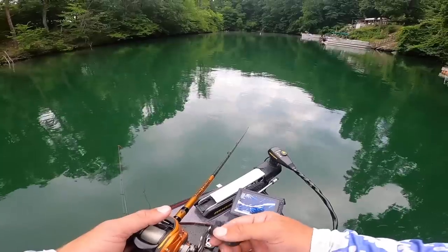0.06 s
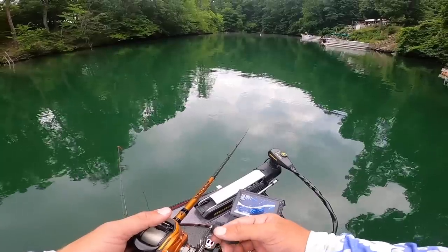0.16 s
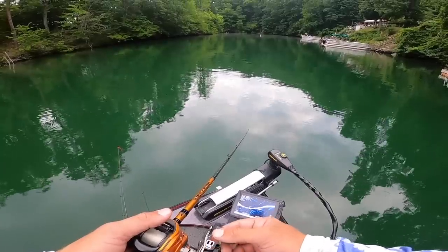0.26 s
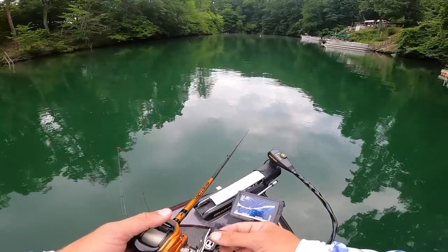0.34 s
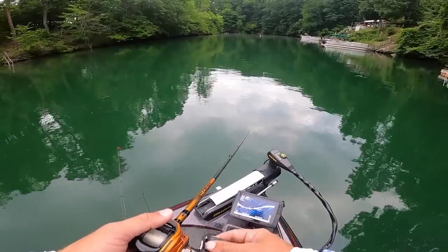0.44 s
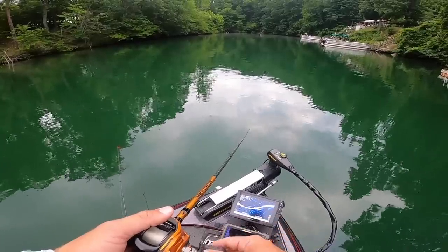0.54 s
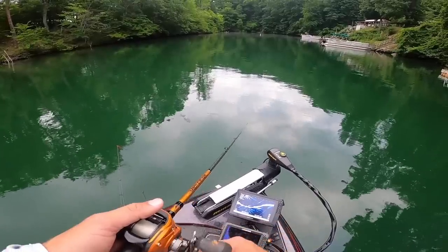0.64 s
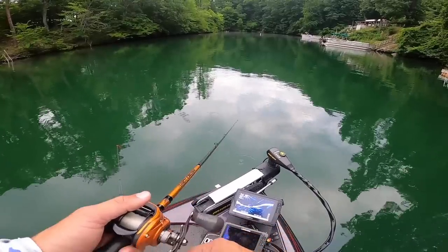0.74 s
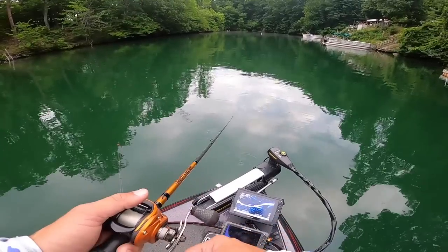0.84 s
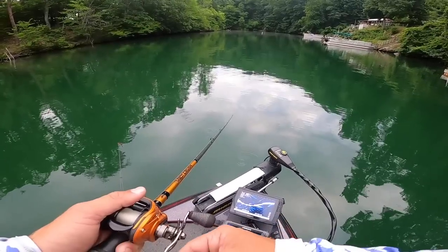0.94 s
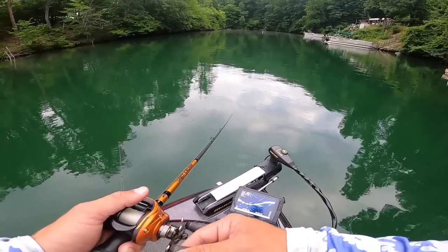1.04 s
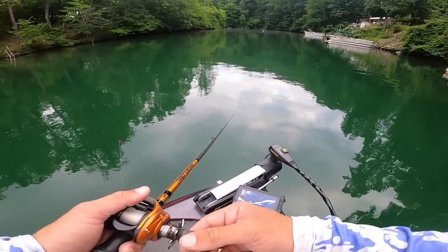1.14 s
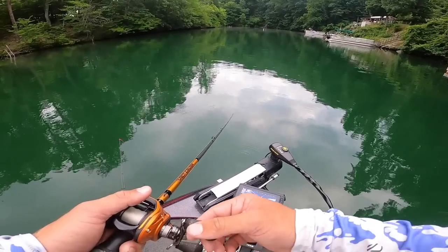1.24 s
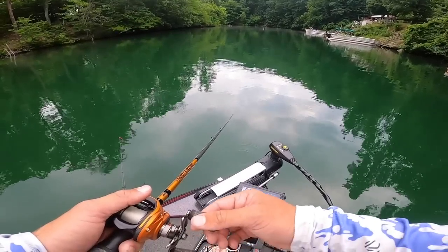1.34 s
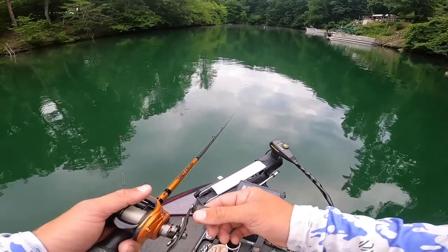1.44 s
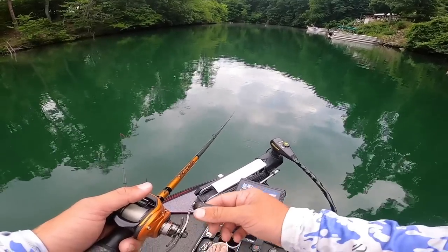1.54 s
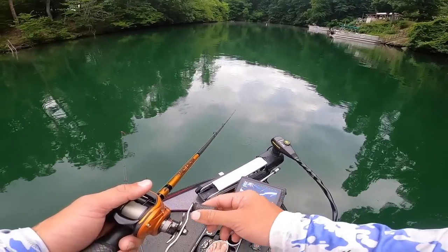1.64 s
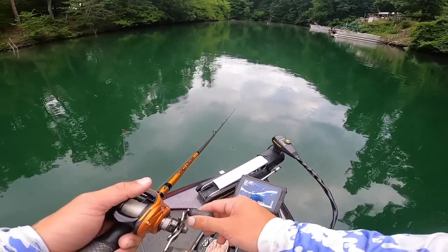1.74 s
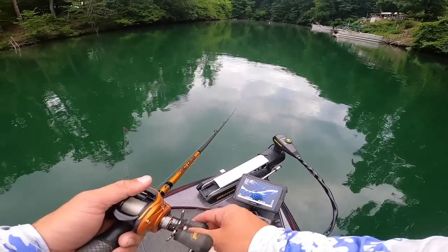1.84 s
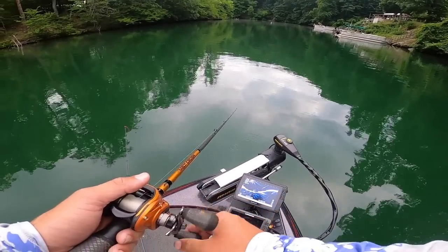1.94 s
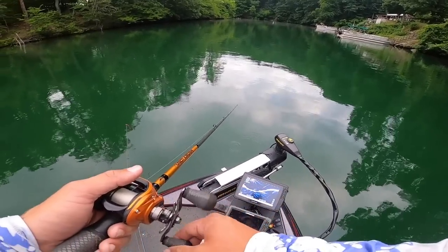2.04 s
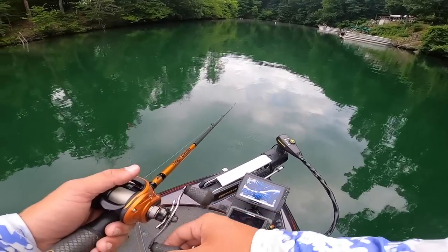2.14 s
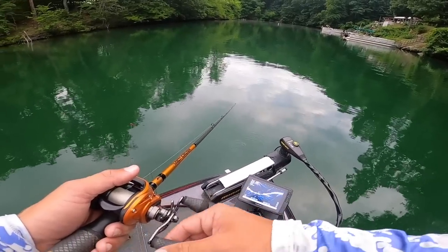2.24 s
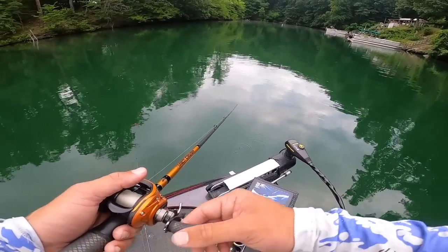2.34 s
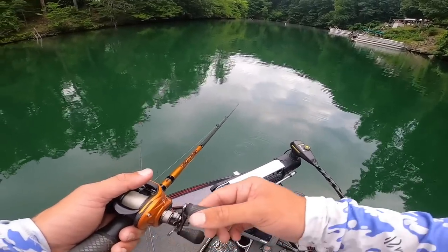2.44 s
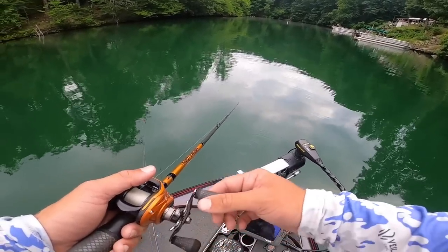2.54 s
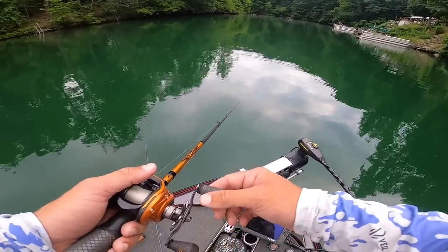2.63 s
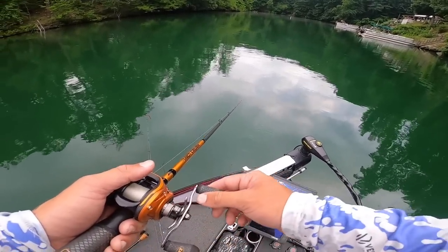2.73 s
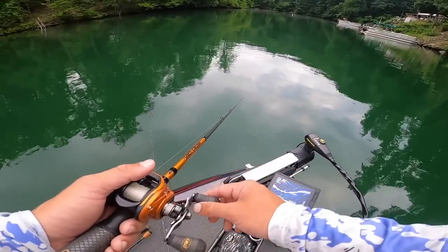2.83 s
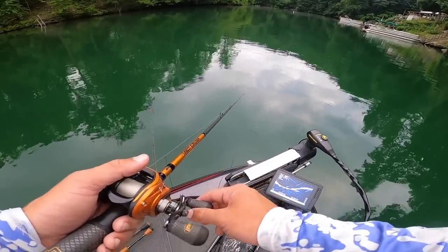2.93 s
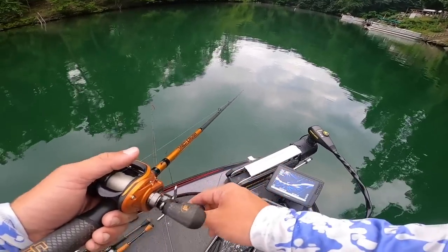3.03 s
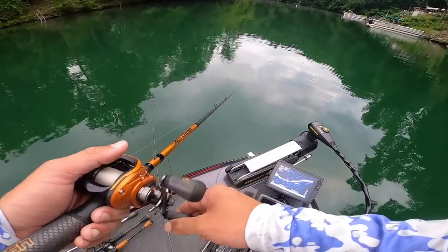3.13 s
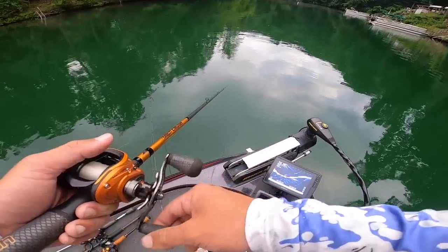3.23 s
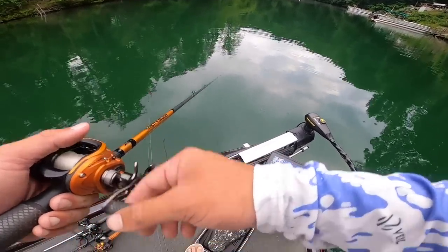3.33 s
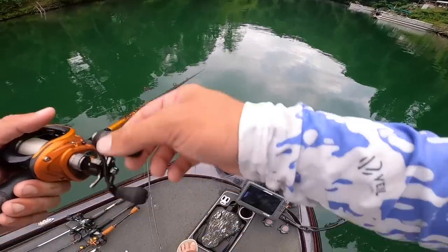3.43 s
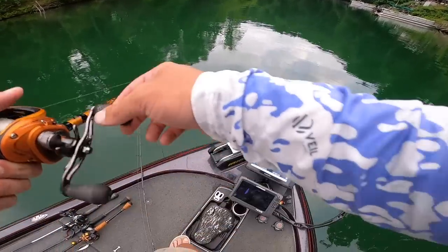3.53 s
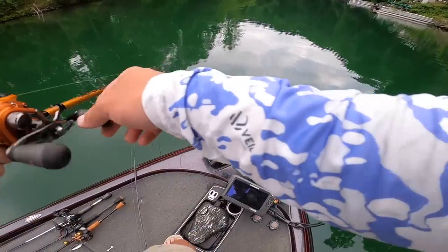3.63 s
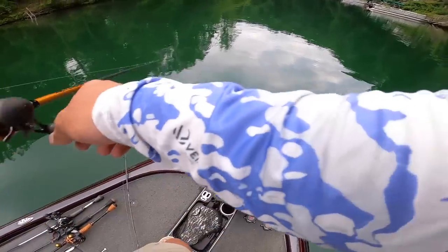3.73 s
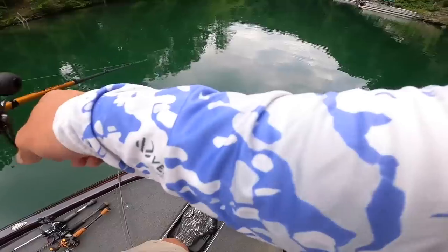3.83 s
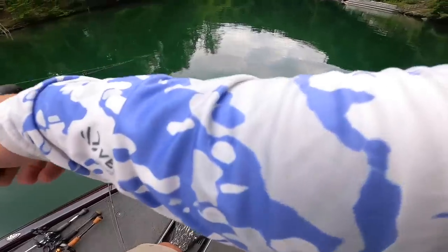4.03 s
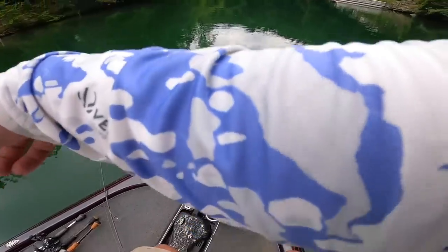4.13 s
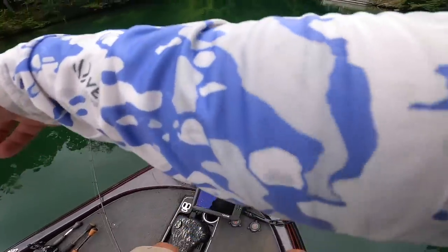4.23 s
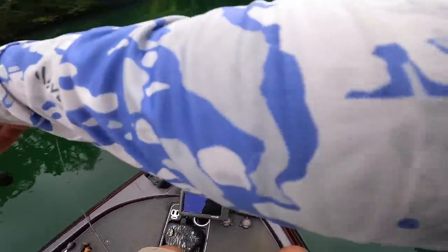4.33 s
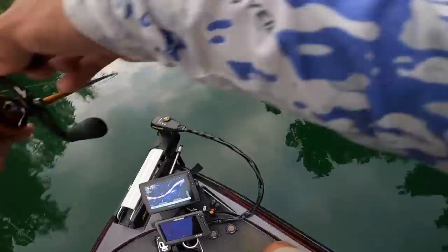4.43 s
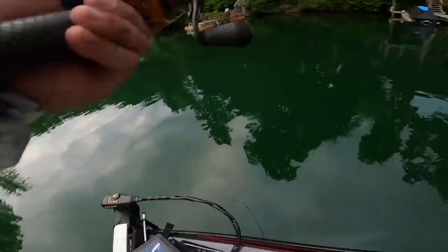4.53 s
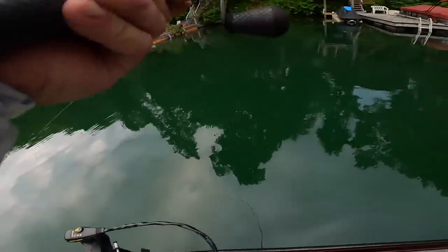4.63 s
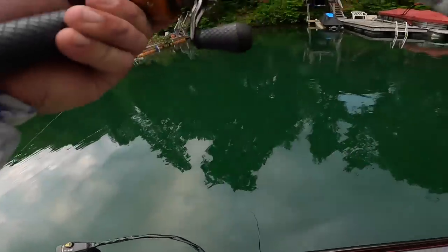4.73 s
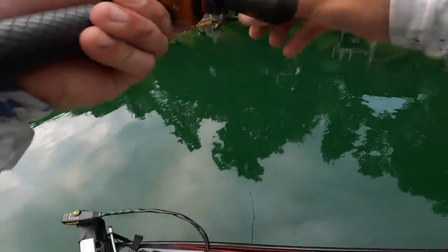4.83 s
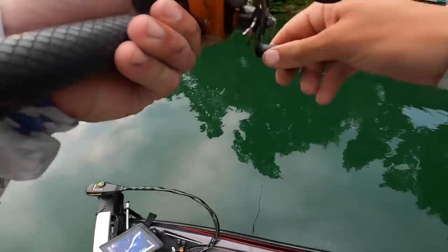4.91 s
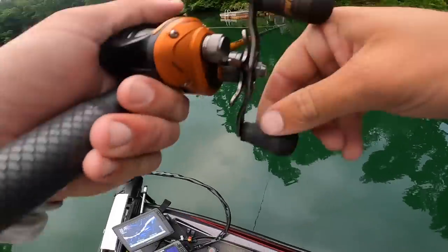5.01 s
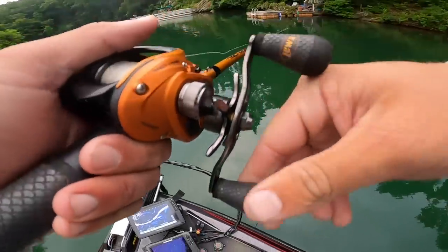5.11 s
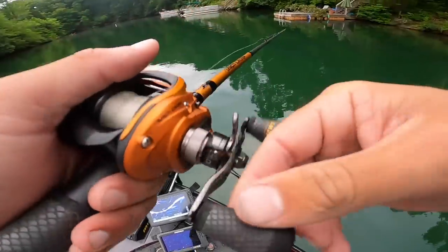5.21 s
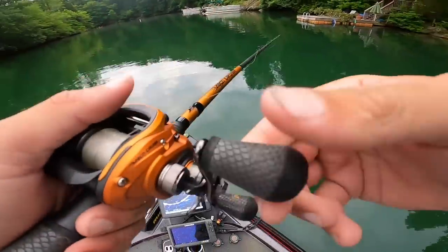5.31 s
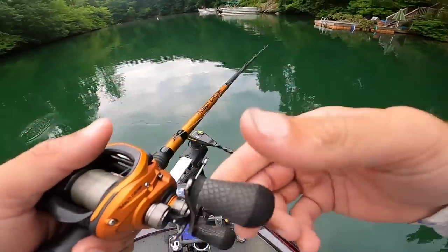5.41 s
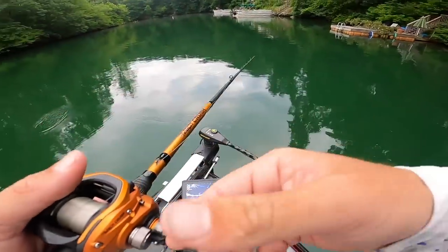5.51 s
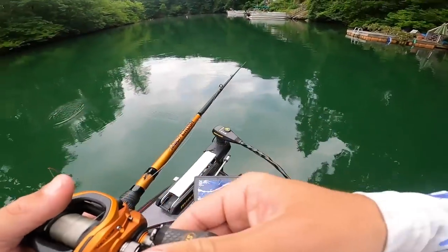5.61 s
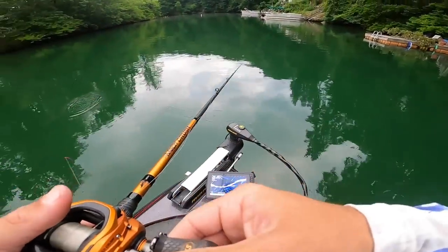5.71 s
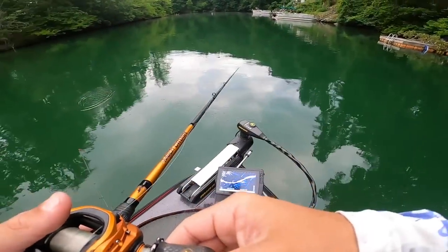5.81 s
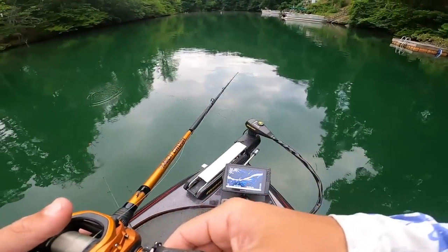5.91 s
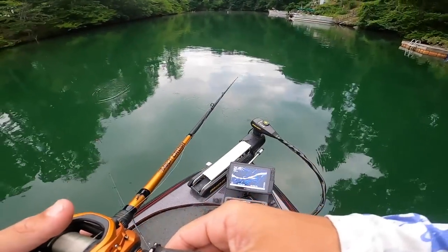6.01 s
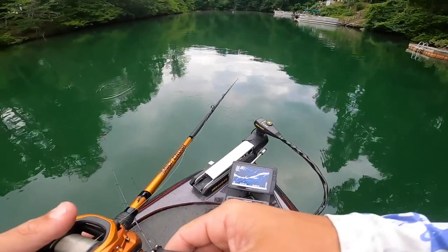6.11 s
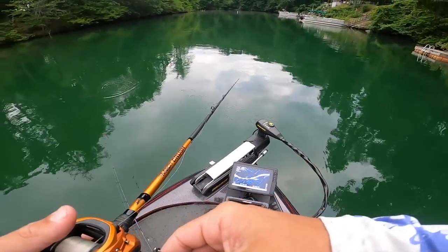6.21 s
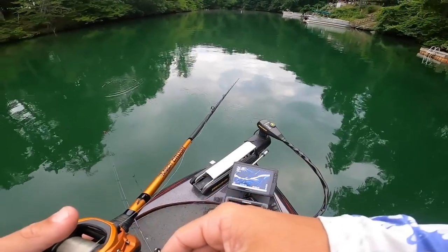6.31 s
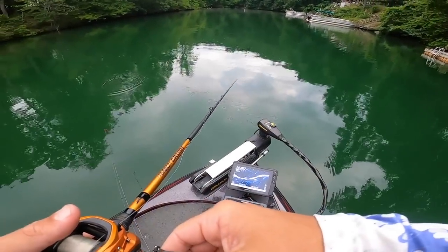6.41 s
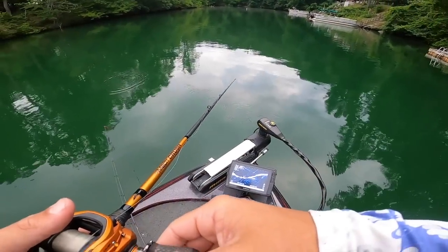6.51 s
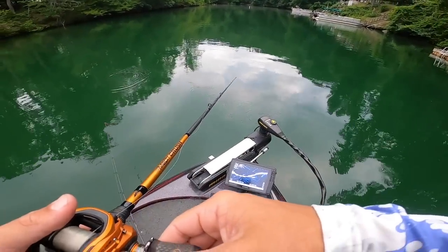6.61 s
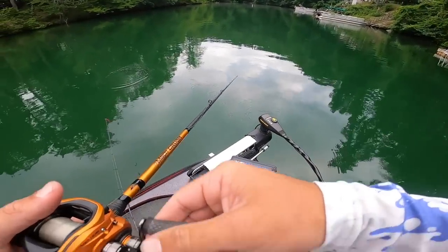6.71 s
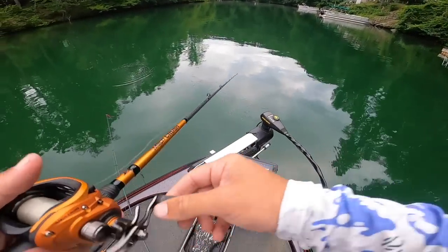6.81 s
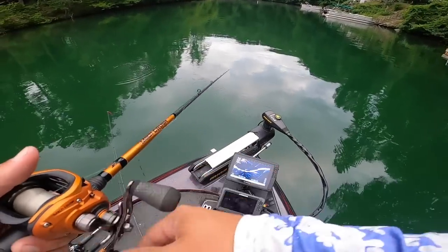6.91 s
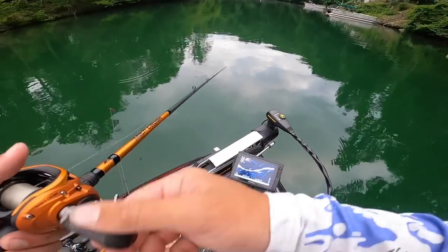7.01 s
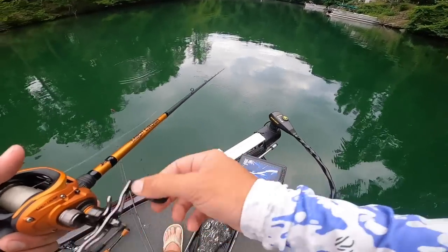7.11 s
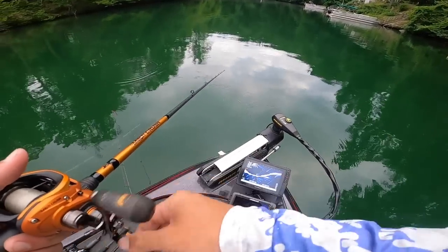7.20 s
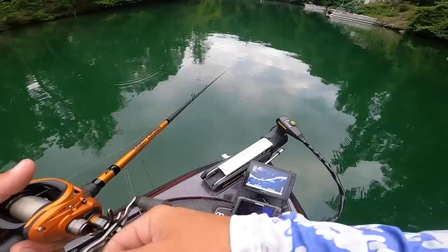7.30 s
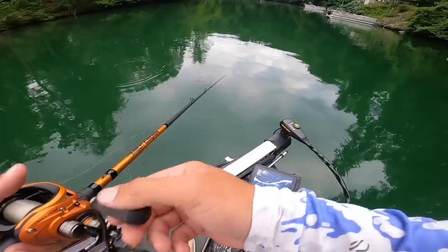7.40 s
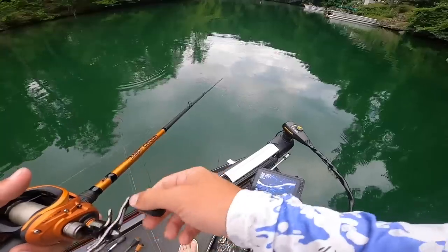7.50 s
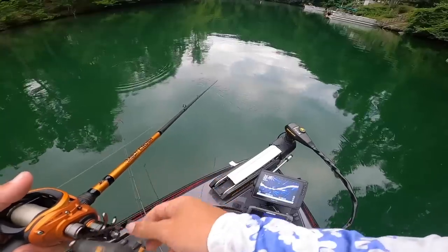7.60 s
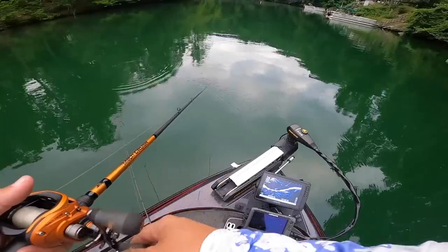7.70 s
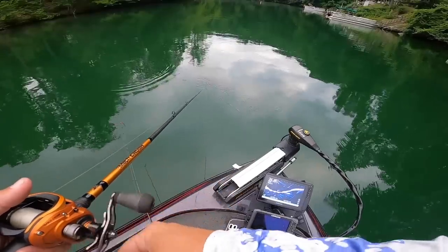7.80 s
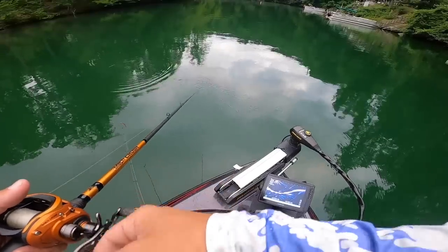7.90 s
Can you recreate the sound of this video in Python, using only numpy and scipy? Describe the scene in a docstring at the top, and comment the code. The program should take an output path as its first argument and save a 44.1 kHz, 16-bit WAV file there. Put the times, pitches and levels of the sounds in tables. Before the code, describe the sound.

Close reel clicks and faint cranking, a hull bump, a short swishing cast, a hard clutch clack, then brisk whirring as slack is wound.

```python
"""Pitching a line from a calm cove

An angler cranks a baitcasting reel slowly, swings the rod and pitches the line out with a short rush;
the clutch clacks back in and the gears whirr as slack is wound up, all close to the chest.
Tooth strikes, a gliding hum and line noise make the reel; ringing modes make its contacts; coloured noise
makes sleeve, hands and air; sinking sines make the hull bumps; gliding whistles and echo make the songbirds."""
import sys
import numpy as np
from scipy import signal
from scipy.fft import rfft, irfft, next_fast_len
from scipy.io import wavfile
from scipy.ndimage import map_coordinates

SR = 44100
rng = np.random.default_rng(int(sys.argv[2]) if len(sys.argv) > 2 else 0)


def store_pcm(level_fs):
    """Save levels as 16-bit WAV."""
    pcm = np.round(np.clip(level_fs, -1, 1) * 32767).astype(np.int16)
    wavfile.write(sys.argv[1], SR, np.atleast_2d(pcm).T)


N = 350595

# ringing modes of the reel's frame: (frequency [Hz], relative level [dB], t60 as a multiple of the contact's)
FRAME_MODES = [(1244, 3, 1.2), (1597, -3, 2.9), (1992, -3, 2.8), (2540, -2.5, 2.7), (2940, 1.5, 0.49),
               (3137, 1, 1.1), (3620, 4, 0.68), (4120, 5.5, 0.31), (4480, 0, 1.26), (5070, 1.5, 0.72),
               (6010, 2, 1), (6870, -9, 0.76), (7300, 0.5, 1.1), (9470, -6.5, 0.8)]


def amp(db):
    """Decibels to gain."""
    return np.exp(np.asarray(db) * np.log(10) / 20)


def unit(x):
    """Scaled to rms 1."""
    return x / np.sqrt(np.mean(x ** 2) + 1e-20)


def along(points, hz):
    """(frequency [Hz], value) points read on a log frequency axis."""
    f, v = np.transpose(points)
    return np.interp(np.log(hz + 1), np.log(f + 1), v)


def wobble(rate):
    """A smooth random curve, rate knots a second."""
    knots = rng.standard_normal(int(N * rate / SR) + 4)
    fine = np.arange(8 * len(knots) - 8) / 8  # eighths of a knot
    curve = map_coordinates(knots, [fine])
    return np.interp(np.arange(N) * rate / SR, fine, curve)


def filtered(x, response):
    """x times a response of frequency."""
    m = next_fast_len(N + 8192, True)
    return irfft(rfft(x, m) * response(np.fft.rfftfreq(m, 1 / SR)), m)[..., :N]


def noise():
    """Two unrelated white noises."""
    return rng.standard_normal((2, N))


def pan(db):
    """Left and right gains for a level difference, positive to the left."""
    return amp([[db / 2], [-db / 2]])


def heard(pair, spectrum, left_db=0):
    """Colours two unrelated signals and mixes them into the two ports at rms 1, then pans."""
    # likeness of the two ports: (frequency [Hz], correlation)
    likeness = [(50, .5), (200, .7), (1200, .8), (2500, .62), (5000, .35), (10000, .1)]

    def mid_side(hz):
        turn = np.arccos(np.clip(along(likeness, hz), -1, 1)) / 2
        return amp(along(spectrum, hz)) * [np.cos(turn), np.sin(turn)]

    mid, side = filtered(pair, mid_side)
    return unit(np.array([mid + side, mid - side])) * pan(left_db)


def ports(pair, side_db):
    """A close sound, alike at both ports but for an unrelated part at side_db."""
    return pair[0] + amp(side_db) * pair[1] * np.array([[1], [-1]])


def add(track, s, sound):
    """Mixes a sound into a track at time s."""
    part = track[:, round(s * SR):][:, :sound.shape[-1]]
    part += sound[..., :part.shape[1]]


def clock():
    """The slow time grid on which gestures are drawn, in s."""
    step_s = .002
    return np.arange(0, N / SR + step_s, step_s)


def smooth(control):
    """A gesture carried from the slow grid to every sample."""
    return np.interp(np.arange(N) / SR, clock(), control)


def swell(middle, length, db):
    """Gain of a movement that grows and fades evenly around a rounded top."""
    edge_db, shape = 4.5, 1.7  # drop at both ends of its length, rounding of the top
    return amp(db - edge_db * np.abs(2 * (clock() - middle) / length) ** shape)


def stroke(s, rise, hold, fall):
    """Gain of a movement that rises to full strength at s, holds and falls."""
    range_db = 24.5  # gained over the rise, lost over the fall
    t = clock()
    return amp(-range_db * (np.maximum(s - t, 0) / rise + np.maximum(t - s - hold, 0) / fall))


def together(gains):
    """Overlapping movements add in power; gain per sample."""
    return smooth(np.linalg.norm(gains, axis=0))


def friction(rate, rough_db, snags=0, snag_db=0):
    """Noise broken into grains by catching and slipping, with sharp snags at a mean rate per second."""
    spikes = (rng.random(N) < snags / SR) * noise() * np.sqrt(SR / (snags + 1))
    return unit(noise() * amp(rough_db * wobble(rate))) + amp(snag_db) * spikes


def cove(air_db=-62, drone_db=-65, drone_hz=166, width_hz=20):
    """Steady outdoor air as coloured noise, with a faint, wavering motor drone from a narrow noise band."""
    # spectrum of the open air: (frequency [Hz], relative density [dB per Hz])
    air_colour = [(25, -18), (55, -0.5), (90, -10), (125, -12.5), (170, -2.5), (280, -7.5), (450, -14.5),
                  (800, -26), (1200, -18.5), (2000, -24), (2800, -24.5), (4200, -27), (7300, -25.5),
                  (8500, -50.5), (12500, -46), (16000, -104)]
    air = heard(noise(), air_colour, left_db=-0.5) * amp(air_db + 1.14 * wobble(1.0))
    drone = filtered(noise()[0], lambda hz: np.exp(-((hz - drone_hz) / width_hz) ** 2))
    return air + amp(drone_db) * unit(drone) * pan(-0.13)


def cranking():
    """Speed and loudness of the gears: both crest in mid-push, and the strongest push sets the speed."""
    # pushes on the reel's handle: (middle [s], length [s], relative level [dB], top speed [gear teeth/s])
    pushes = [(0.045, 0.28, -65, 100), (0.202, 0.022, -62, 146), (0.559, 0.062, -61.5, 106),
              (0.831, 0.24, -61.5, 93), (0.977, 0.053, -63, 83), (1.266, .3, -69, 57.6),
              (1.666, 0.17, -62.5, 52.5), (1.94, 0.1, -64.5, 62), (2.369, 0.48, -59.5, 77.6),
              (3.044, 0.8, -65, 72), (3.806, 0.48, -65.5, 46), (6.955, 0.071, -44.5, 285),
              (7.066, 0.058, -54, 270), (7.136, 0.062, -52.5, 290), (7.27, 0.16, -47, 295),
              (7.546, 0.22, -56.5, 182), (7.692, 0.58, -58, 150)]
    droop, slowest = .16, 35  # slowing towards the ends of a push, floor [teeth/s]
    t = clock()
    gains = np.array([swell(s, length, db) for s, length, db, top in pushes])
    speeds = [top / (1 + droop * (2 * (t - s) / length) ** 2) for s, length, db, top in pushes]
    speed = np.average(speeds, axis=0, weights=gains ** 4 + 1e-60)
    return smooth(np.maximum(speed, slowest)), together(gains)


def mesh(turns, tooth_db, fade, grit, scrape_hz=1500, spread=1.1):
    """Each tooth strikes at its own strength, smeared by the frame, then scrapes in the treble until the next."""
    tooth = turns.astype(int)
    size = amp(tooth_db * rng.standard_normal(8192))[tooth]
    strikes = np.diff(tooth, prepend=0) * np.sqrt(1 / np.gradient(turns))
    strikes = filtered(strikes, lambda hz: np.exp(-1j * spread * np.sqrt(hz)))  # low bending waves arrive later
    fading = unit(noise() * np.exp(-fade * (turns % 1)))
    scrape = filtered(fading, lambda hz: hz ** 2 / (hz ** 2 + scrape_hz ** 2))
    return size * (grit * scrape + strikes * np.array([[1], [0]]))  # strikes reach both ports alike


def gears(teeth_db=-4.5, line_db=-1.0, whirr_db=0.0, whirr_grit=2.0, uneven_db=2, uneven_rate=14, surge_db=2):
    """Slow cranking purrs tooth by tooth under line hiss; quick turns merge into a whirr with a gliding hum."""
    # spectra of the quick gearbox, slow teeth, line on the spool: (frequency [Hz], relative density [dB per Hz])
    gearbox_colour = [(150, -19), (250, 1.5), (298, -2), (373, -2), (586, -2), (686, -8.5), (890, 6),
                      (1220, -3), (1760, 5), (2200, -3), (2850, 0.5), (3800, -9), (5630, -6), (8850, -23),
                      (13000, -34), (16000, -76)]
    teeth_colour = [(400, -24), (850, -16), (1150, 0), (1600, 0), (2100, -5), (3000, -16), (8000, -40),
                    (15000, -75)]
    line_colour = [(900, -8.5), (1300, 0.5), (2200, -3), (2800, 0.5), (3800, -9), (6200, -1.5), (7000, -12),
                   (7600, -3), (8400, -20), (11000, -23), (15000, -46)]
    hum_orders, hum_db = 6, -9  # harmonics of the tooth rate, level against the push at top speed
    whirr_speed, steepness = 133, 5.9  # purr turns into whirr [teeth/s], how abruptly

    speed, loudness = cranking()
    halting = np.cumsum(speed * np.exp(.15 * wobble(60))) / SR
    running = np.cumsum(speed * np.exp(.013 * wobble(70))) / SR
    purr = mesh(halting, tooth_db=2.8, fade=5, grit=1.6) * amp(uneven_db * wobble(uneven_rate))
    whirr = mesh(running, tooth_db=1.5, fade=0.5, grit=whirr_grit) * amp(surge_db * wobble(45))

    hum = np.zeros(N)
    for k in range(1, hum_orders + 1):
        strength = amp(along(gearbox_colour, k * speed) + 2 * wobble(40))
        hum += strength * np.sin(2 * np.pi * (k * running + rng.random()))
    hum *= amp(hum_db) * (speed / speed.max()) ** 2 / np.sqrt(hum_orders)

    line = friction(rate=30, rough_db=3.5)
    slow = amp(teeth_db) * heard(purr, teeth_colour, left_db=7.5)
    slow += amp(line_db) * heard(line, line_colour, left_db=1.5)
    quick = amp(whirr_db) * heard(whirr, gearbox_colour, left_db=4.5) + hum * pan(5.4)
    share = 1 / (1 + (whirr_speed / speed) ** steepness)
    return loudness * ((1 - share) * slow + share * quick)


def sleeve_line_and_hands(hiss_db=4, cloth_db=-2, clump_db=1.17, clump_rate=80):
    """Sleeve and line slide as grainy noise in the swing and, fainter, the cranking; the hands shift on the grip."""
    # strokes of sleeve and line: (full strength at [s], rise [s], hold [s], fall [s],
    # relative hiss level [dB], cloth level added to it [dB])
    strokes = [(0.205, 0.34, 0.3, 1, -93, 26.5), (2.084, 0.05, 0.16, 0.24, -68, 8),
               (3.244, 0.034, 0.035, 0.19, -48.5, 7.5), (3.38, 0.069, 0.16, 0.35, -57.5, 6),
               (3.69, 0.67, 0.18, 0.21, -63, -5), (4.035, 0.44, 0.046, 0.048, -63.5, 0.5),
               (4.482, 0.48, 0.06, 0.046, -57, 5.5), (4.607, 0.11, 0.045, 0.14, -41.5, 7),
               (4.923, 0.23, 0.035, 0.13, -50, -5), (5.077, 0.16, 0.042, 0.37, -54, 0),
               (5.321, 0.1, 0.027, 0.25, -52.5, 4), (5.558, 0.18, 0.44, 0.24, -69, 5.5),
               (6.79, .1, 0.11, 0.96, -68, 8.5), (7.484, 0.95, 0.13, 0.57, -68, 12.5)]
    # shifts of the hands on the grip: (middle [s], length [s], level [dB])
    grips = [(2.204, 0.11, -48.5), (3.268, 0.1, -50.5), (3.478, 0.26, -51), (4.28, 0.067, -53.5),
             (4.512, 0.057, -46.5), (4.672, 0.085, -35.5), (4.864, 0.39, -46.5), (5.38, 0.1, -53.5),
             (5.676, 0.45, -62.5), (6.822, 0.048, -57.5), (6.929, 0.054, -49), (7.165, 0.053, -52.5),
             (7.702, 0.41, -58.5)]
    # spectra of hiss, cloth and hands: (frequency [Hz], relative density [dB per Hz])
    hiss_colour = [(1200, 1.5), (2400, 7), (3300, 6), (4500, 4), (6200, -1.5), (7500, -1.5), (8500, -14),
                   (11000, -15.5), (16000, -42)]
    cloth_colour = [(200, -10.5), (450, -4), (750, -3.5), (1300, 3.5), (2000, -0.5), (3000, 1), (6000, -83)]
    hands_colour = [(60, -6), (130, 0), (230, -3.5), (450, -18.5), (900, -31.5), (2000, -48.5)]

    sliding = together([stroke(*shape) * amp(db) for *shape, db, above in strokes])
    brushing = together([stroke(*shape) * amp(db + above) for *shape, db, above in strokes])
    crackle = friction(rate=450, rough_db=3.5, snags=600, snag_db=-6)
    scuffs = friction(rate=250, rough_db=4)
    hiss = heard(crackle, hiss_colour, left_db=2) * sliding * amp(hiss_db)
    cloth = heard(scuffs, cloth_colour, left_db=4.5) * brushing * amp(cloth_db)
    hands = heard(friction(rate=62, rough_db=3.0), hands_colour, left_db=-1.0)
    hands = hands * together([swell(*grip) for grip in grips])
    return (hiss + cloth) * unit(amp(clump_db * wobble(clump_rate))) + hands


def whistle(hz, db, taper):
    """A pure tone along a pitch glide, with soft ends."""
    return amp(db) * np.sin(2 * np.pi * np.cumsum(hz) / SR) * signal.windows.tukey(len(hz), taper)


def trees(song, t60):
    """Diffuse echo from the wooded shore: the song convolved with dying noise."""
    t = np.arange(SR * 2 // 3) / SR
    tail = rng.standard_normal((2, len(t))) * amp(-60 * t / t60)
    return signal.oaconvolve(song, tail / np.linalg.norm(tail[0]), axes=1)[:, :N]


def birds(chip_db=-2, chip_echo_db=-4, scatter_db=-15, note_echo_db=-2.5, echo_t60=0.59, waver=0.021):
    """Nearby chips and farther warbled notes, scattered by leaves and blurred by echoes among the trees."""
    # one bird's repeated high, rising chip: (time [s], relative level [dB])
    chip_calls = [(0.757, -48.5), (2.292, -48), (3.505, -49), (6.342, -51.5)]
    # whistled notes of the other birds: (time [s], length [s], start [Hz], end [Hz], relative level [dB])
    whistled = [(0.466, 0.022, 5240, 5500, -59), (.53, 0.031, 5060, 4620, -60),
                (0.57, 0.07, 5350, 5490, -61), (0.529, 0.03, 2490, 2980, -56),
                (0.674, 0.058, 2565, 3270, -54.5), (2.406, 0.061, 3530, 3440, -54),
                (2.489, 0.035, 2484, 2740, -47.5), (2.521, 0.034, 2790, 3850, -49.5),
                (2.578, 0.04, 3100, 2680, -50), (3.102, 0.059, 2350, 2180, -52),
                (4.24, 0.019, 3460, 3720, -52.5), (4.252, 0.038, 3550, 2650, -53),
                (4.295, 0.045, 2790, 2900, -49.5), (5.607, 0.26, 5250, 4840, -63),
                (6.331, 0.0675, 3116, 2780, -55), (6.388, 0.044, 3140, 3880, -54.5),
                (6.452, 0.036, 4800, 4930, -56.5), (6.57, 0.046, 3066, 2606, -48.5),
                (6.612, 0.038, 2470, 3030, -50), (6.638, 0.044, 2965, 4100, -51),
                (6.696, 0.031, 3380, 2913, -50)]
    from_hz, to_hz, glide_s, chip_s = 4700, 7130, .0055, 0.026
    note_direct_db, scatter_t60 = -8, .05  # notes come mostly by way of the leaves

    chips, notes, tremor = np.zeros((1, N)), np.zeros((1, N)), 1 + waver * wobble(900)
    wavering = lambda s, hz: hz * tremor[round(s * SR):][:len(hz)]
    chip_hz = to_hz + (from_hz - to_hz) * np.exp(-np.arange(0, chip_s, 1 / SR) / glide_s)
    for s, db in chip_calls:
        add(chips, s, whistle(wavering(s, chip_hz), db, taper=0.55))
    for s, length, start_hz, end_hz, db in whistled:
        glide = np.linspace(start_hz, end_hz, round(length * SR))
        add(notes, s, whistle(wavering(s, glide), db, taper=0.3))
    echo = trees(amp(chip_echo_db) * chips + amp(note_echo_db) * notes, echo_t60)
    scatter = amp(scatter_db) * trees(notes + chips, scatter_t60)
    return amp(chip_db) * chips + amp(note_direct_db) * notes + scatter + echo


def clicks(focus_db=7, crack=0.91, tail_db=-27, tail_t60=0.093, attack=0.0002, side_db=-5):
    """Each contact rings the frame around its own centre pitch, with a crack and a faint rattle after it."""
    # sharp contacts in reel and rod:
    # (time [s], relative level [dB], centre [Hz], left-right difference [dB], base t60 [s])
    contacts = [(0.734, -39, 6010, 1, 0.012), (0.927, -40.5, 5630, -1, 0.0082),
                (1.115, -45.5, 4500, 1, .012), (1.155, -41.5, 6140, -2, 0.01),
                (1.258, -38, 5600, 1, 0.0069), (1.28, -45, 5500, 4, .009), (1.503, -40.5, 6540, 5, 0.0075),
                (1.882, -36.5, 1963, 5, 0.019), (2.11, -40.5, 1512, 0, 0.052),
                (2.1974, -24, 1060, 0, 0.033), (2.377, -40, 2700, 5, 0.016), (2.514, -37, 5370, 1, 0.0088),
                (2.711, -41.5, 2320, 0, 0.025), (3.2193, -20, 2580, 3, 0.0084),
                (3.237, -31, 4020, 8.5, 0.014), (3.2506, -22.5, 2770, -3.5, 0.0097),
                (3.2915, -29, 4180, -1, 0.014), (3.3155, -21.5, 3400, 1, 0.016),
                (3.342, -37, 7100, 0, 0.014), (3.3615, -19, 1730, -1, 0.031),
                (3.4528, -16, 3670, -1, 0.016), (3.458, -18.5, 4030, 4, 0.018),
                (3.478, -31.5, 3880, -1, 0.028), (3.502, -33, 1850, 0, 0.079), (3.548, -28, 2800, 0, 0.042),
                (3.6558, -29.5, 4100, 1, 0.021), (3.6648, -34.5, 5510, 5, 0.0078),
                (3.738, -35, 3780, -1, 0.018), (3.821, -35, 3820, -1, 0.014),
                (3.8614, -38, 5000, 4, 0.0068), (4.4681, -22, 2278, 9, 0.0095),
                (4.48, -18, 5070, 1, 0.0055), (4.537, -27, 5800, 5.5, 0.056),
                (4.556, -25.5, 3750, 11, 0.033), (4.5682, -14.5, 4270, 12, 0.006),
                (4.58, -21, 5000, 2, 0.016), (4.584, -19, 4500, 5, 0.0087),
                (4.591, -16.5, 3780, 15, 0.0064), (4.595, -13, 4200, 13, 0.0051),
                (4.7088, -6, 5300, 3, 0.0074), (4.859, -30, 2860, 6, 0.017),
                (4.882, -16.5, 3740, -0.5, 0.0078), (4.894, -19.5, 4200, 9, 0.0074),
                (4.902, -15.5, 5000, 5, 0.0072), (4.943, -13.5, 3870, 5, 0.0042),
                (4.965, -23, 6030, 7, 0.0045), (5.0008, -29.5, 4800, 6, 0.0085),
                (5.079, -32.5, 5500, 1, 0.011), (5.1114, -6, 3900, 1, 0.012),
                (5.1126, -1.5, 1390, -1.5, 0.0058), (5.127, -20.5, 4200, -4, 0.011),
                (5.207, -27, 2430, 3, 0.013), (5.397, -20.5, 3300, 2, 0.015),
                (5.397, -30.5, 11000, -1, .012), (5.423, -25.5, 4070, -1, 0.01),
                (5.429, -35, 3590, -4, 0.0081), (5.664, -36, 2130, 7, 0.012), (6.286, -50, 2560, 9, 0.06),
                (6.787, -40, 1485, -1.5, 0.021), (6.9255, -27.5, 2565, 0, 0.012),
                (6.946, -24.5, 2405, 5, 0.016), (7.038, -33.5, 2616, 3, 0.06),
                (7.093, -33.5, 1046, 5, 0.052), (7.399, -28.5, 3347, 2, 0.024),
                (7.855, -44, 6005, 3, 0.016)]
    crack_colour = [(150, -1.0), (750, 2), (1300, 7.0), (6800, -2.0), (8500, -11), (12000, -15.0), (16000, -29.0)]
    track, t = np.zeros((2, N)), np.arange(3072) / SR
    hz, mode_db, life = np.transpose(FRAME_MODES)
    f = np.fft.rfftfreq(len(t), 1 / SR)
    # neighbouring modes start in opposite directions; the side part is a quarter cycle ahead
    phase = np.pi * np.arange(len(hz))[:, None] + np.pi / 2 * np.arange(2)[:, None, None]
    for s, db, centre_hz, left_db, t60 in contacts:
        focus = lambda x: amp(-focus_db / (0.12 + 1 / (np.log2((x + 1) / centre_hz) ** 2 + 1e-9)))
        gains = focus(hz) * amp(mode_db + rng.standard_normal((2, len(hz))))
        pitch = hz * np.exp(0.0097 * rng.standard_normal(len(hz)))
        modes = np.sin(2 * np.pi * pitch[:, None] * t + phase) * amp(-60 * t / (t60 * life[:, None]))
        ring = (gains[..., None] * modes).sum(1) / np.linalg.norm(gains[0])
        colour = focus(f) * amp(along(crack_colour, f))
        grit = unit(irfft(rfft(rng.standard_normal((2, len(t)))) * colour, len(t)))
        dying = crack * amp(-60 * t / t60) + amp(tail_db - 60 * t / tail_t60)
        hit = (ring + grit * dying) * (1 - np.exp(-t / attack))
        # short waves differ more between the ports
        spaced = ports(hit, side_db + 4 * np.log2(centre_hz / 3000))
        add(track, s, amp(db - 8.5) * spaced * pan(left_db))
    return track


def buffet():
    """Moving air thuds on each microphone port in its own lumps of low noise."""
    # puffs of air on the ports: (middle [s], length [s], level [dB], left-right difference [dB])
    gusts = [(1.89, 0.1, -53, -1), (2.541, 0.078, -49, 0), (3.45, 0.062, -46.5, 0), (4.59, 0.12, -40.5, 5),
             (4.84, 0.21, -39, 3.5), (5.4, 0.23, -45, 3.5), (5.896, 0.15, -44.5, 11),
             (6.35, 0.13, -51.5, 2), (6.875, 0.14, -59, 7), (7.64, 0.19, -52.5, 1)]
    # spectrum of the thuds: (frequency [Hz], relative density [dB per Hz])
    thud_colour = [(15, 4.5), (28, 1.5), (55, 5.5), (90, -13.5), (200, -14), (600, -78)]
    lumps = amp(3.5 * np.array([wobble(10), wobble(10)]))
    rumble = filtered(ports(noise(), side_db=-3), lambda hz: amp(along(thud_colour, hz)))
    puffs = np.array([swell(s, length, db) * pan(left_db) for s, length, db, left_db in gusts])
    return unit(lumps * rumble) * np.array([together(puffs[:, 0]), together(puffs[:, 1])])


def spool(left_db=5):
    """The free spool's bearings chatter into its resonances until the clutch stops it."""
    # resonances of the spool: (frequency [Hz], width [Hz], relative level [dB])
    resonances = [(2660, 590, 3), (2860, 750, -21), (4260, 190, -12)]
    # nudges that ring the spool briefly: (time [s], level [dB])
    nudged = [(1.882, -48), (4.8, -33.5), (4.823, -35)]
    free_s, spin_up_s, stop_s = 4.855, 0.017, 5.115  # released, time to reach speed, caught by the clutch
    spin_db, sag_db_per_s, nudge_t60 = -43.5, 22, 0.048
    t = clock()
    age = np.maximum(t - free_s, 0)
    spin = (1 - np.exp(-age / spin_up_s)) * amp(spin_db - sag_db_per_s * age) * (t < stop_s)
    nudges = [(t >= s) * amp(db - 60 * np.abs(t - s) / nudge_t60) for s, db in nudged]
    ring = lambda f: sum(amp(db) / (1 + ((f - hz) / width * 2) ** 2) for hz, width, db in resonances)
    chatter = heard(friction(rate=130, rough_db=1.0), [(100, 0)])  # flat spectrum
    return unit(filtered(chatter, ring)) * together([spin, *nudges]) * pan(left_db)


def knocks(attack_cycles=1.64, side_db=-8):
    """Soft contacts give a short, rough clunk with little above its top pitch; the duller, the slower it starts."""
    # dull knocks of hand and rod butt: (time [s], level [dB], top pitch [Hz], t60 [s])
    clunks = [(2.184, -46.5, 1296, 0.22), (2.196, -49, 2600, 0.06), (2.482, -48, 424, 0.15),
              (3.365, -44, 1050, 0.36), (4.053, -43.5, 878, 0.058), (4.475, -38, 550, 0.068),
              (4.598, -20, 446, 0.033), (4.745, -32, 629, 0.072), (5.112, -42, 456, 0.17),
              (5.427, -34, 780, 0.026), (6.884, -48.5, 492, 0.11), (7.138, -49, 422, 0.24)]
    track, t = np.zeros((2, N)), np.arange(SR // 6) / SR
    f = np.fft.rfftfreq(len(t), 1 / SR)
    for s, db, top_hz, t60 in clunks:
        band = f / (f + .3 * top_hz) / np.sqrt(1 + (f / top_hz) ** 8)
        body = unit(irfft(rfft(rng.standard_normal((2, len(t)))) * band, len(t)))
        envelope = amp(db - 60 * t / t60) * (1 - np.exp(-t * top_hz / attack_cycles))
        add(track, s, ports(body, side_db) * envelope)
    return track


def bumps(sag=0.27, lead=0.13):
    """Low sines through the hull sag in pitch as they die and shake the two ports slightly out of step."""
    # bumps: (time [s], relative level [dB], starting pitch [Hz], rise [s], t60 [s])
    hull = [(2.185, -24.5, 106.7, 0.0051, 0.23), (2.2, -19, 173, 0.00098, 0.069),
            (2.231, -30, 75.6, 0.01, 0.14), (2.482, -29, 166, 0.001, 0.08), (2.496, -31, 100.5, 0.041, 0.1),
            (3.431, -35, 145.6, 0.0091, 0.17), (3.462, -33, 82.5, 0.0063, 0.13),
            (4.057, -35.5, 116.8, 0.01, 0.085), (5.113, -26.5, 42.4, 0.0021, 0.36),
            (5.117, -20.5, 108, 0.0019, 0.045)]
    track, t = np.zeros((2, N)), np.arange(SR // 3) / SR
    for s, db, hz, rise, t60 in hull:
        phase = 2 * np.pi * np.cumsum(hz * (1 - sag * (1 - np.exp(-t / t60)))) / SR
        envelope = (1 - np.exp(-(t / rise) ** 2)) * amp(-60 * t / t60)
        shake = np.sin(phase + lead * np.array([[1], [-1]]))
        add(track, s, amp(db - 5.0) * envelope / envelope.max() * shake)
    return track


def rattle():
    """Loose parts touch at random moments, each contact ringing the frame's modes in its own mix."""
    # spells of rattling: (middle [s], length [s], level [dB])
    spells = [(3.272, 0.07, -42.5)]
    per_s, scatter_db, t60 = 480, 3.5, .007  # mean contact rate, spread of strength, base decay [s]
    t = np.arange(1024) / SR
    contacts = (rng.random(N) < per_s / SR) * amp(scatter_db * np.clip(rng.standard_normal(N), -2, 2))
    hz, mode_db, life = np.transpose(FRAME_MODES)[..., None]
    modes = amp(mode_db - 60 * t / (t60 * life)) * np.sin(2 * np.pi * hz * t) / np.hypot(1, hz / 2800)
    modes = modes * (1 - np.exp(-t / .0004))  # soft onset
    track = np.zeros((2, N))
    for at in np.flatnonzero(contacts):
        add(track, at / SR, contacts[at] * rng.standard_normal((2, len(modes))) @ modes)
    return unit(ports(track, side_db=-5.5)) * together([swell(*spell) for spell in spells])


def guides(glide_per_s=-0.33, left_db=5):
    """The taut line sings over the rod's guides in narrow noise bands that sink as the swing slows."""
    # bands of the song: (frequency at the middle [Hz], width [Hz], relative level [dB])
    sing_bands = [(2380, 480, -2.5), (3580, 220, -18), (5680, 1300, -6.5), (6700, 900, -11)]
    middle_s, length_s, sing_db = 4.642, 0.077, -38.5
    pitch = 1 + glide_per_s * np.clip(np.arange(N) / SR - middle_s, -length_s, length_s)
    phase = 2 * np.pi * np.cumsum(pitch) / SR
    band = lambda hz, width: wobble(width) * np.cos(hz * phase) + wobble(width) * np.sin(hz * phase)
    song = sum(amp(db) * band(hz, width) for hz, width, db in sing_bands)
    return unit(song) * smooth(swell(middle_s, length_s, sing_db)) * pan(left_db)


def scene():
    """Reel, rod and boat in front of the cove."""
    surroundings = cove() + birds() + buffet()
    reel = gears() + clicks() + spool() + rattle()
    rod_and_boat = sleeve_line_and_hands() + knocks() + bumps() + guides()
    return surroundings + reel + rod_and_boat


def record(dry):
    """The microphone path keeps nothing above its band limit."""
    top_hz = 15700
    return filtered(dry, lambda hz: hz < top_hz)


dry = scene()
out = record(dry)
store_pcm(out)
```